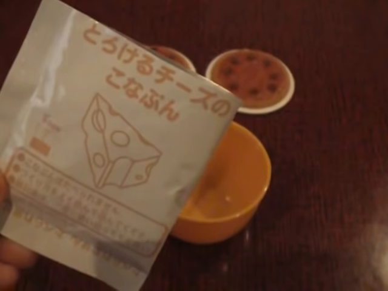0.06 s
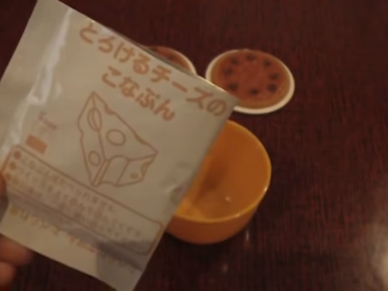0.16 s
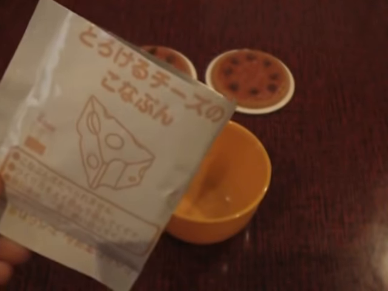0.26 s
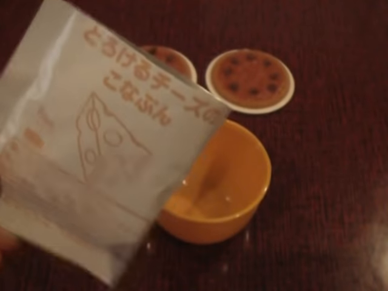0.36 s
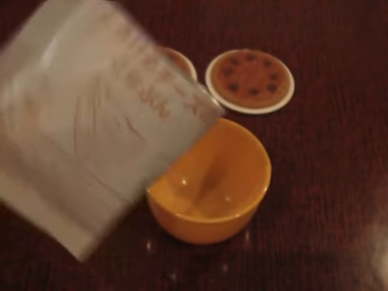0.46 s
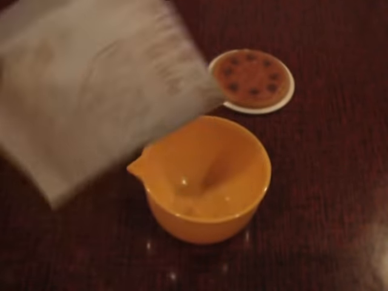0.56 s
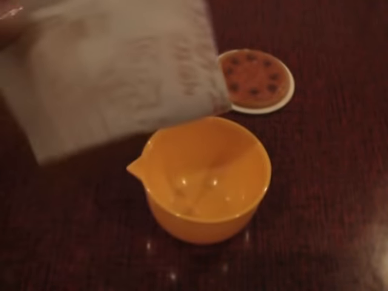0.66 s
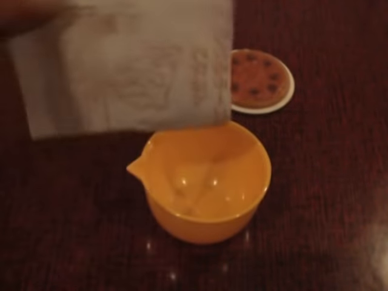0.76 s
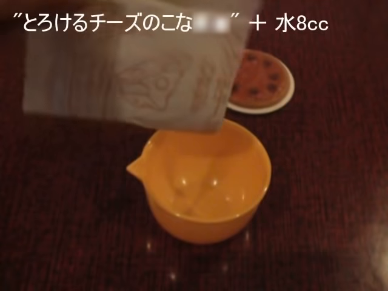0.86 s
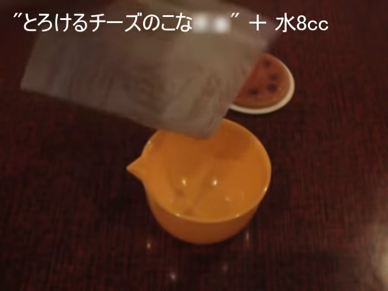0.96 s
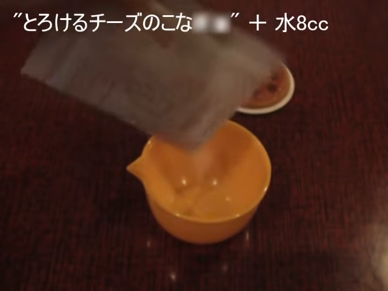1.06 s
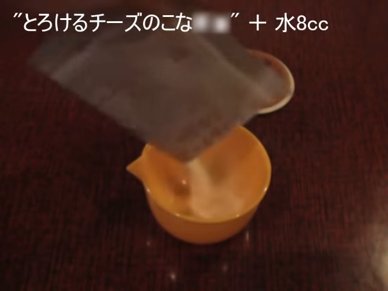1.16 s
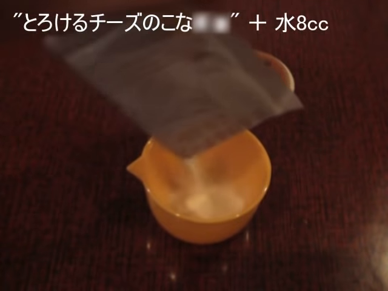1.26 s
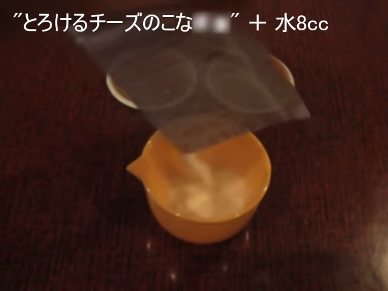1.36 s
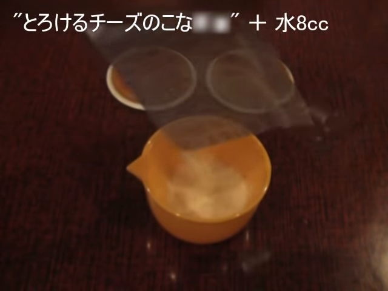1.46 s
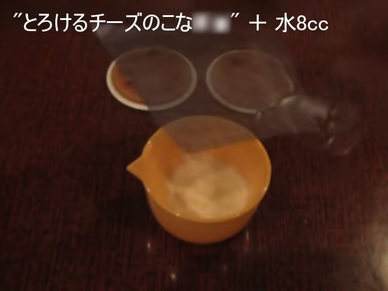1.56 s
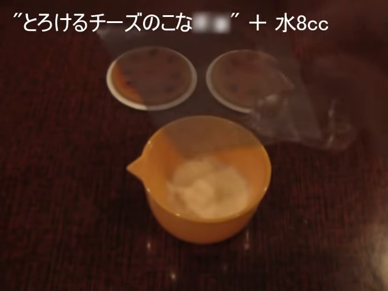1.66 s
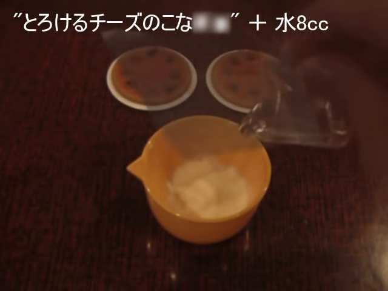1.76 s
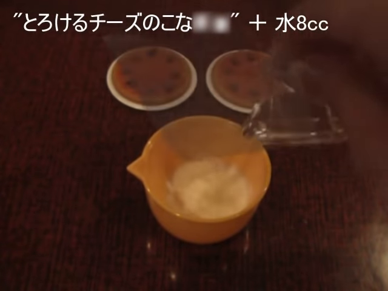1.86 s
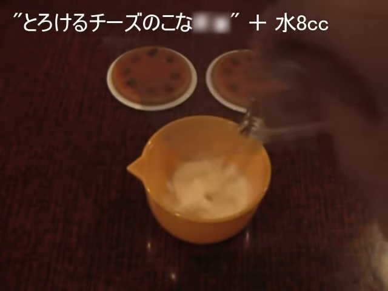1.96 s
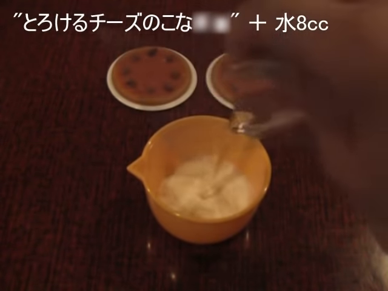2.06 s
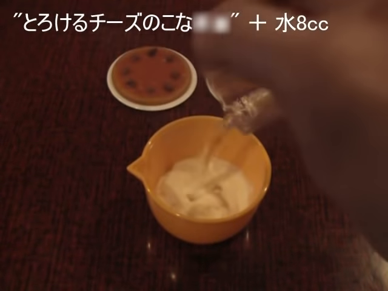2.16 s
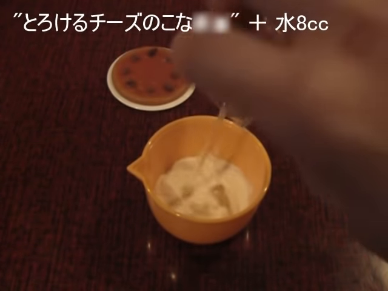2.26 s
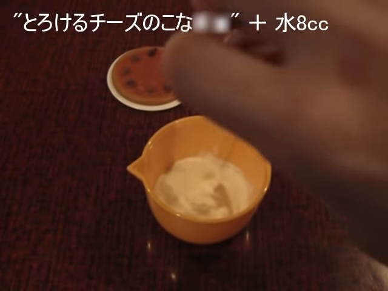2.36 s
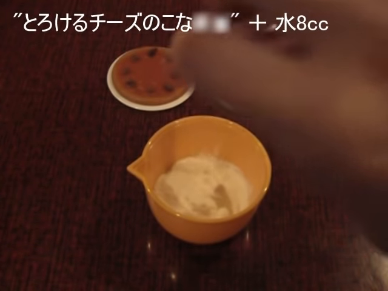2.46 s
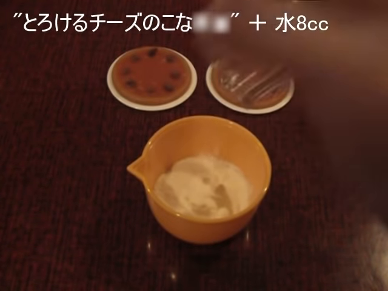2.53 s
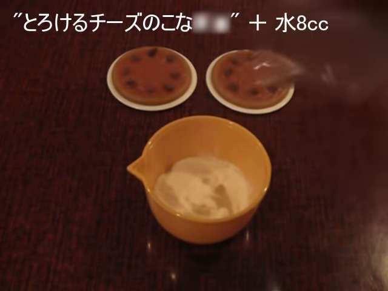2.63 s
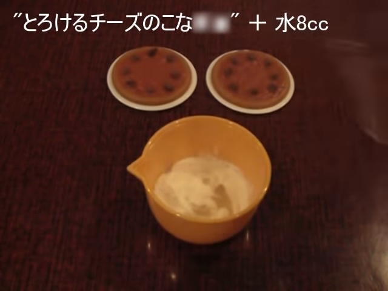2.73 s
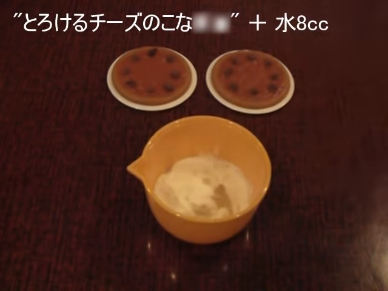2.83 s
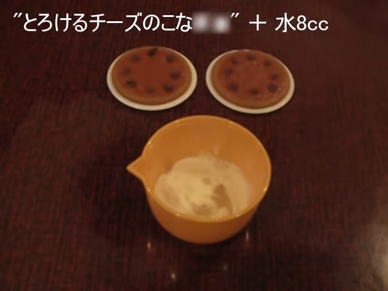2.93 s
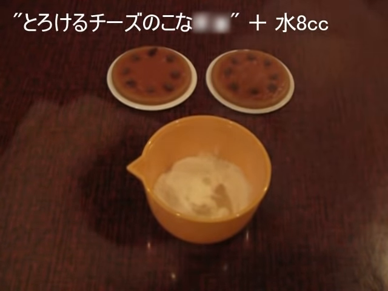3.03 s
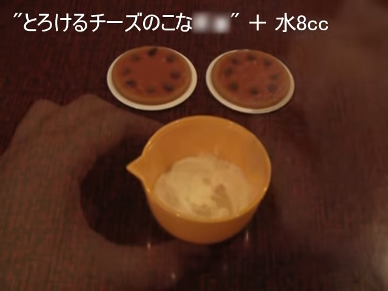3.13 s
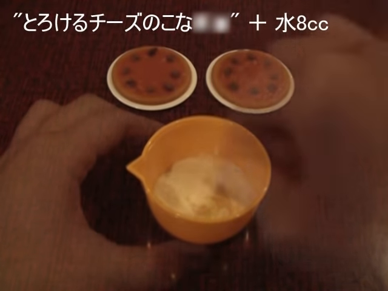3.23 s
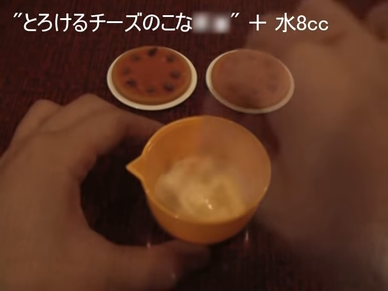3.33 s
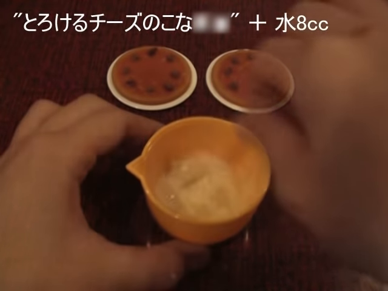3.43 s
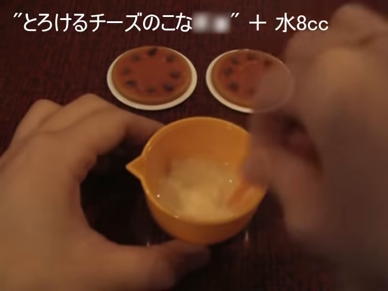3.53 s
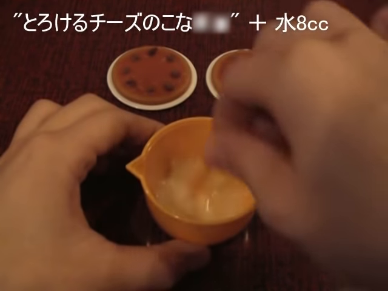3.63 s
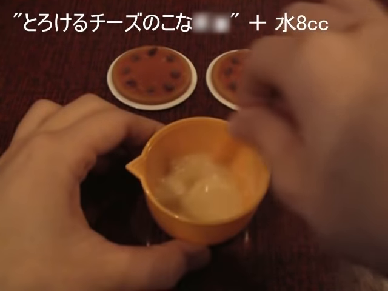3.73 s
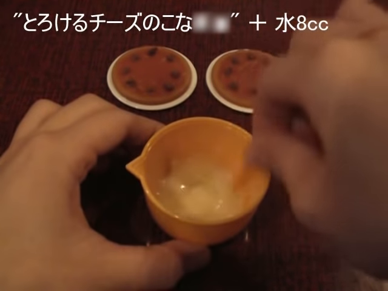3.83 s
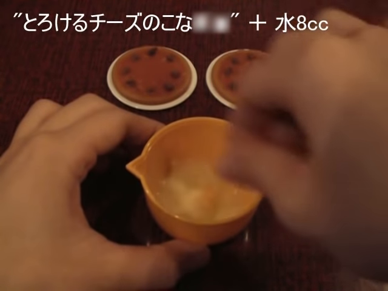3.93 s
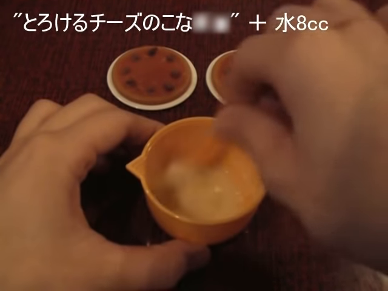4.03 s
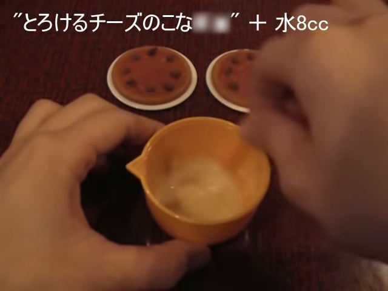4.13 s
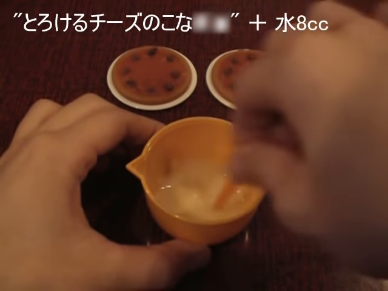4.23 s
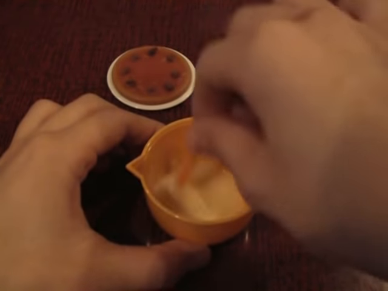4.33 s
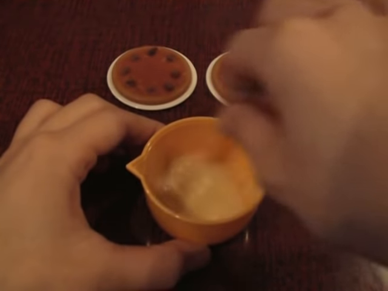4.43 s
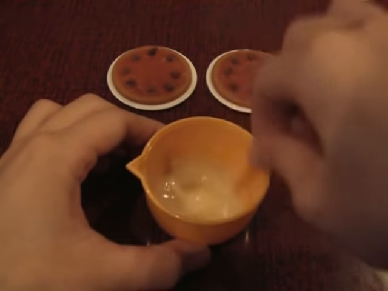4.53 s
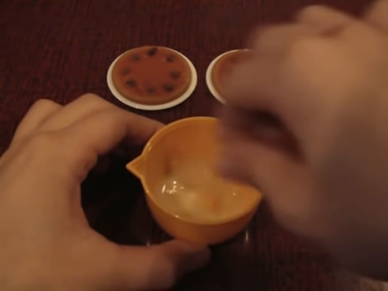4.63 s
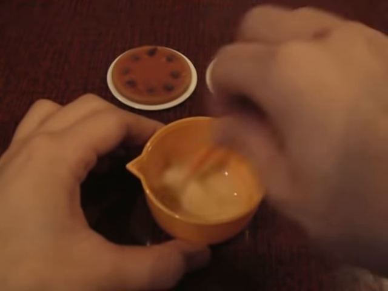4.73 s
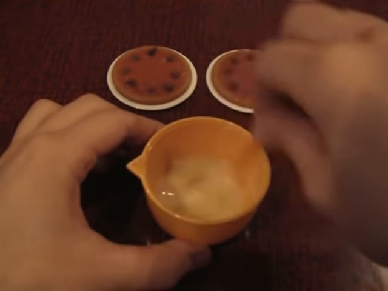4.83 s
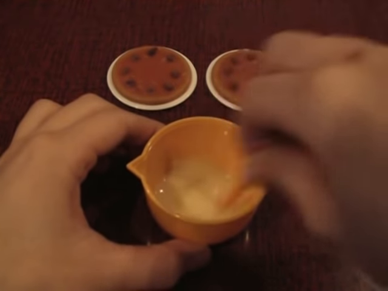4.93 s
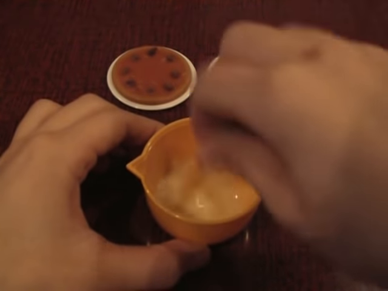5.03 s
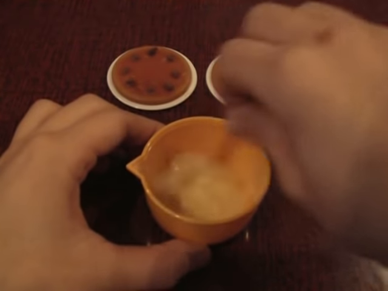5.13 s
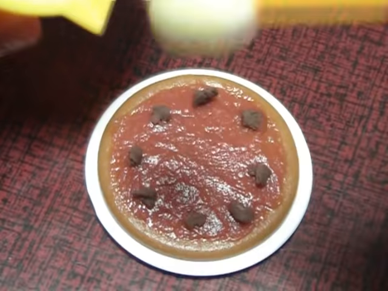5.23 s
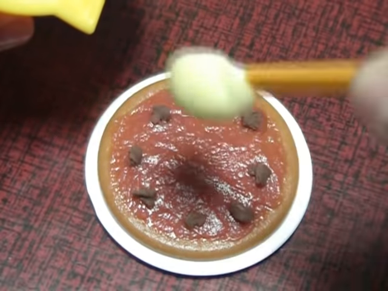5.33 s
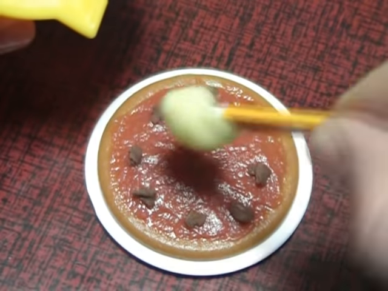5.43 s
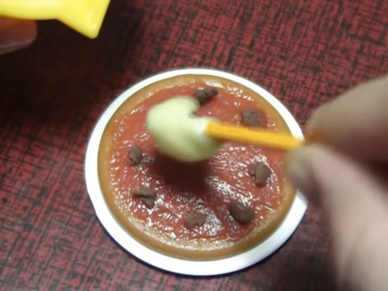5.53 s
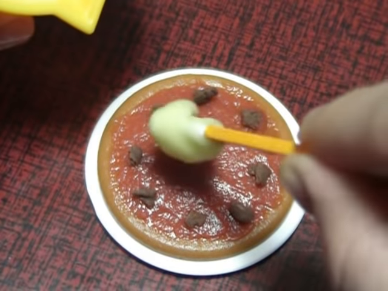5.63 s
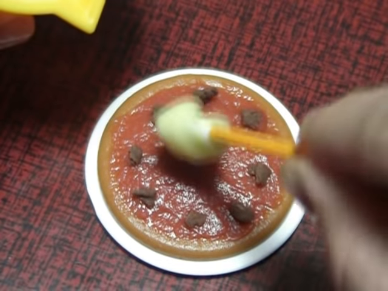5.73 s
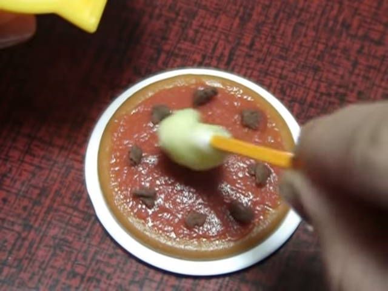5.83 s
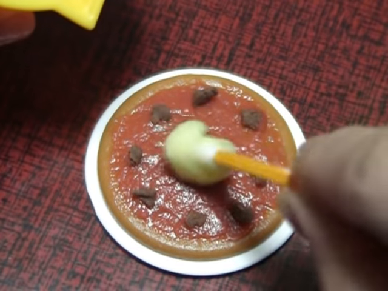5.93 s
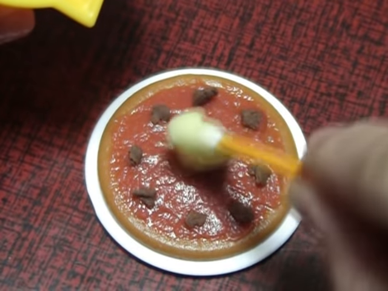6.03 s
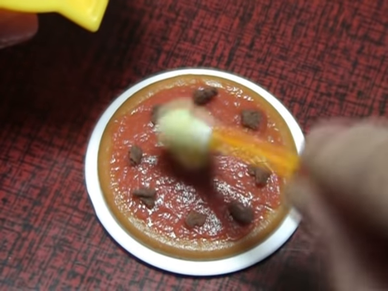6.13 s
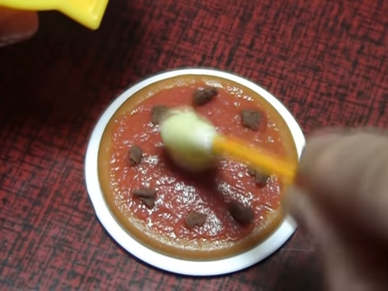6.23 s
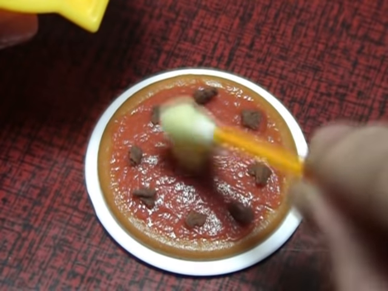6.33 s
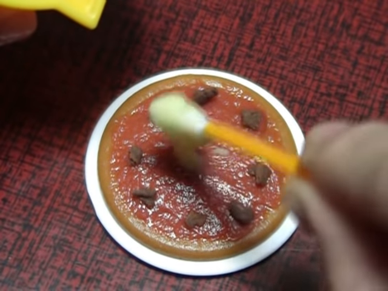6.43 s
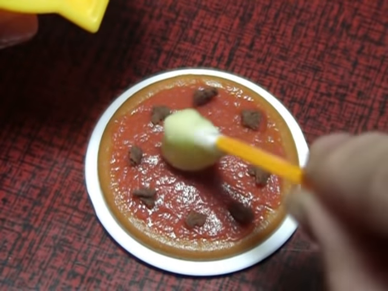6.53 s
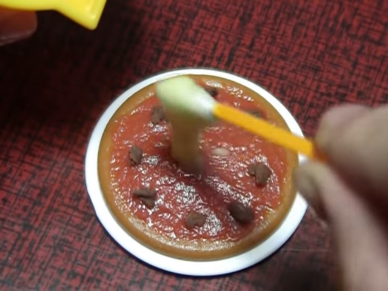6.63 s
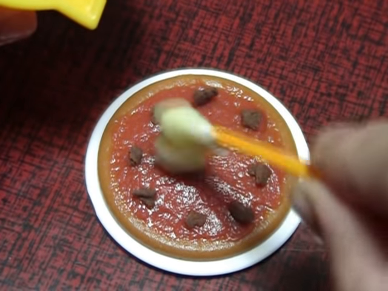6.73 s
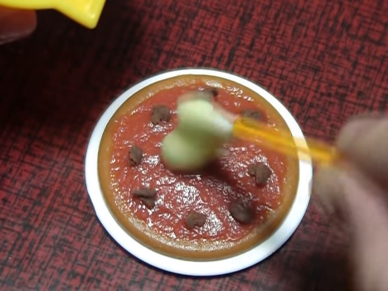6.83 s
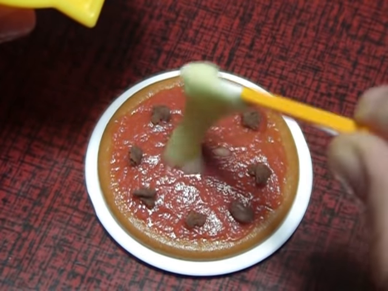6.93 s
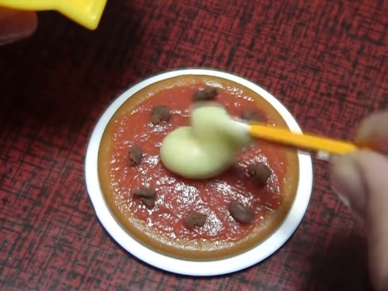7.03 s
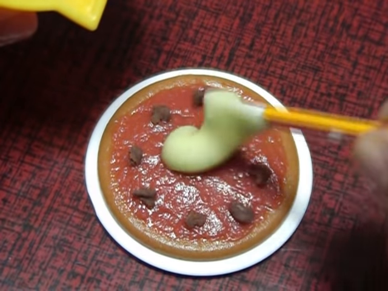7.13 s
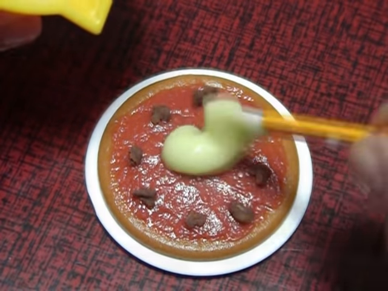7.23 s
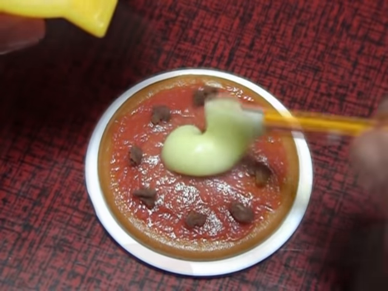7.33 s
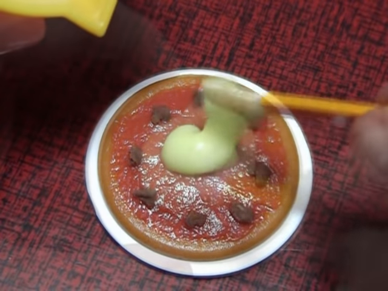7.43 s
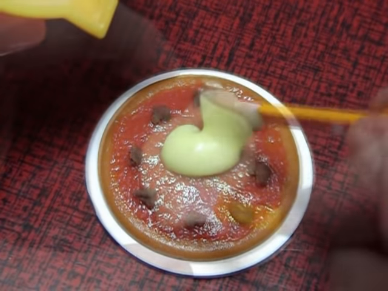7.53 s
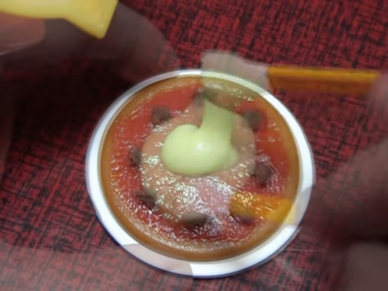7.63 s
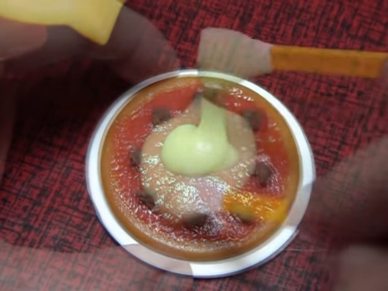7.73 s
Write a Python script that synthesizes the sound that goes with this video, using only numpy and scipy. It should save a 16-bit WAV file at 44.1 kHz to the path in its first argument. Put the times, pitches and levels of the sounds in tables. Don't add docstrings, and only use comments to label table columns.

```python
import sys
import numpy as np
from scipy import signal
from scipy.fft import rfft, irfft, next_fast_len
from scipy.io import wavfile
from scipy.ndimage import uniform_filter1d

SR = 44100
rng = np.random.default_rng(int(sys.argv[2]) if len(sys.argv) > 2 else 0)


def voltage_ratio(level):
    return 10 ** (np.asarray(level, float) / 20)


def waveform_to_disk(signal):
    frames = np.transpose(np.atleast_2d(signal))
    scaled = np.clip(frames, -1, 1) * 32767
    samples = np.round(scaled).astype(np.int16)
    wavfile.write(sys.argv[1], SR, samples)


N = 343344
T = np.arange(N) / SR
CUT_S = 5.235

# [t/s, room noise level/dB, motor hum level/dB]
BACKGROUND = [
    (0.0, -63.5, -62.5),
    (0.48, -63, -59.5),
    (1.91, -65, -66.5),
    (3.22, -65.5, -59),
    (4.8, -64.5, -62),
    (5.24, -63, -59.5),
    (6.93, -65, -58.5),
    (7.51, -67.5, -61),
]


def evened(x):
    return x / np.sqrt(np.mean(x ** 2) + 1e-20)


def read(points, hz):
    f, value = np.transpose(points)
    return np.interp(np.log(hz + 1), np.log(f + 1), value)


def follow(rows, column):
    rows = np.array(rows)
    return np.interp(T, rows[:, 0], rows[:, column])


def add(mix, s, sound):
    part = mix[round(s * SR):][:len(sound)]
    part += sound[:len(part)]


def colour(x, db_at):
    size = next_fast_len(N)
    gain = voltage_ratio(db_at(np.fft.rfftfreq(size, 1 / SR)))
    return irfft(rfft(x, size) * gain, size)[..., :N]


def ring(x, hz, width_hz):
    b, a = signal.iirpeak(np.clip(hz, 20, 2e4), max(hz / width_hz, .5), SR)
    return signal.lfilter(b, a, x)


def ring_twice(x, hz, width_hz):
    return ring(ring(x, hz, width_hz), hz, width_hz)


def slide(x, hz, width_hz):
    turn = np.exp(2j * np.pi * np.cumsum(hz) / SR)
    r = np.exp(-np.pi * width_hz / SR)
    return 2 * (turn * signal.lfilter([1 - r], [1, -r], x / turn)).real


def wander(centre_hz, spread, samples=1200):
    drift = uniform_filter1d(rng.standard_normal(N), samples)
    drift = evened(uniform_filter1d(drift, samples))
    return centre_hz * np.exp(spread * np.clip(drift, -2, 2))


def levels(moves, stops, rise_db, layer_share=None, edge_s=0.0013):
    out = np.zeros(N)
    ends = np.sort(np.r_[[row[0] for row in moves], stops, N / SR])
    for start, rise_s, db, fade, *layer_db in moves:
        t = np.arange(0, ends[ends > start + 1e-4][0] - start, 1 / SR)
        swell_db = rise_db * (t / max(rise_s, 1e-4) - 1)
        shape_db = np.where(t < rise_s, swell_db, -fade * (t - rise_s))
        level_db = db + shape_db if layer_share is None else db + layer_db[0] + layer_share * shape_db
        add(out, start, voltage_ratio(level_db) * np.clip(np.minimum(t, t[-1] - t) / edge_s, 0, 1))
    return out


def grains(per_s, spread_db, grain_ms, smooth):
    size_db = spread_db * np.minimum(rng.exponential(1, N), 2.6)
    slips = (rng.random(N) < per_s / SR) * voltage_ratio(size_db)
    fade = np.exp(-1000 / (grain_ms * SR))
    return rng.standard_normal(N) * (smooth + evened(signal.lfilter([1], [1, -fade], slips)))


def clicks(events, sharpness, edges_hz, contact_ms, usual_share=.4):
    out, t = np.zeros(N), np.arange(1600) / SR
    band = signal.butter(3, edges_hz, "bandpass", fs=SR, output="sos")
    bursts = rng.standard_normal((len(events), len(t)))
    for (s, db, hz, *share), noise in zip(events, bursts):
        burst = noise * np.exp(-1000 * t / contact_ms) * np.minimum(t / 0.0003, 1)
        tone = ring(ring(burst, hz, hz / sharpness), hz, hz / 1.3)
        snap_share = share[0] if share else usual_share
        sound = evened(tone) + snap_share * evened(signal.sosfilt(band, burst))
        add(out, s, voltage_ratio(db) * sound / abs(signal.hilbert(sound)).max())
    return out


def scrape():
    # [t/s, rise/s, wall level/dB, fade/(dB/s), grit re wall/dB]
    strokes = [(3.08, 0.0088, -47.5, 600, -6), (3.135, 0.033, -52, 330, -2.5), (3.22, 0.047, -47, 100, -4),
               (3.28, 0.0071, -45.5, 150, -1), (3.315, .01, -43.5, 50, 0), (3.345, 0.029, -52.5, 0, -2),
               (3.397, .002, -60, 0, -2), (3.414, .003, -48.5, 100, -3), (3.46, .002, -57, 0, 3),
               (3.49, 0.0035, -46.5, 100, 5), (3.512, .012, -48.5, 60, 6.5), (3.575, .002, -58.5, 0, 4),
               (3.64, .003, -53, 0, 2), (3.672, 0.0025, -48.5, 120, -1.5), (3.83, 0.0025, -44, 0, -3.5),
               (3.853, 0.0041, -35.5, 500, -4), (3.89, 0.0033, -52, 280, -1.5), (3.93, 0.061, -49, 5, 0),
               (3.972, 0.003, -44, 113, 0.5), (4.152, 0.072, -45.5, 166, -3.5),
               (4.283, 0.0063, -44.5, 130, -1), (4.345, 0.0033, -46, 100, 0), (4.372, 0.0044, -42, 400, -4),
               (4.451, 0.0056, -41.5, 230, -1.5), (4.533, .003, -48, 30, 2), (4.585, .002, -51, 60, 4.5),
               (4.62, .004, -46, 200, 2.5), (4.636, 0.036, -43, 0, 4), (4.672, 0.0025, -31.5, 20, -7.5),
               (4.695, 0.0017, -42, 215, -3.5), (4.832, .002, -44, 200, -1.5), (4.86, .002, -45, 500, -2),
               (4.878, 0.018, -43, 100, -2), (4.906, .002, -42, 500, 1), (4.925, .002, -50, 200, 2),
               (4.966, 0.002, -48, 150, 6), (5.014, .004, -40, 38, -0.5), (5.054, 0.0017, -40.5, 186, -2),
               (5.124, 0.0032, -37.5, 285, -2.5)]
    lifts = [
        3.724,
        4.074,
        4.408,
        4.765,
        5.19,
    ]
    # [t/s, rise/s, rumble level/dB, fade/(dB/s)]
    pushes = [(3.08, .002, -72, 110), (3.254, .002, -71, -14), (3.83, 0.02, -60, 120),
              (3.95, .02, -52, 100), (4.15, 0.042, -60.5, 15), (4.36, .015, -55, 100),
              (4.45, .005, -57, 30), (4.66, 0.017, -50.5, 300), (4.855, .006, -55, 70),
              (5.01, 0.014, -57, 38), (5.115, .012, -48, 400)]
    # [f/Hz, width/Hz, level/dB]
    cup_modes = [(851, 380, -9), (1860, 80, 4.5), (2430, 56, -23), (3040, 160, 1), (3560, 320, -0.5),
                 (4090, 12, 0.5), (4630, 96, 5)]
    # [f/Hz, density/dB per Hz]
    wall_db = [(260, -30), (450, -14), (787, 3), (860, 9), (1010, -8.5), (2490, -10.5), (2810, -15),
               (3600, -4.5), (6500, -51), (8450, -53), (14300, -120)]
    # [f/Hz, density/dB per Hz]
    grit_db = [(3240, -22), (5500, -8.5), (6660, -8.5), (7120, -2), (7730, -3.5), (8390, 1), (9810, -5.5),
               (11700, -16.5), (14000, -51)]
    # [t/s, f/Hz]
    tip_path = [(3.09, 1440), (3.17, 2800), (3.43, 1220), (3.5, 2420), (3.7, 1510), (3.86, 2570),
                (3.9, 1860), (4.2, 1950), (4.255, 3800), (4.29, 2550), (4.45, 1390), (4.52, 1700),
                (4.6, 3900), (4.65, 2200), (4.84, 1500), (4.9, 2330), (5.02, 2200), (5.055, 3600),
                (5.13, 1450)]
    rise_db = 12.5

    slip = grains(per_s=260, spread_db=2.2, grain_ms=2.2, smooth=.9)
    crush = .6 * evened(slip) + evened(grains(per_s=180, spread_db=2, grain_ms=.9, smooth=.9))

    broad = evened(colour(slip, lambda hz: read(wall_db, hz)))
    reach = uniform_filter1d(rng.standard_normal((len(cup_modes), N)), 1500)
    modes = np.zeros(N)
    for (hz, width_hz, db), r in zip(cup_modes, reach):
        mode_db = db + 5.4 * evened(r).clip(-3, 1.2)
        modes += voltage_ratio(mode_db) * ring(slip, hz, max(width_hz, 110))
    tip_hz = follow(tip_path, column=1)
    patch = evened(slide(slide(slip, tip_hz, 1200), tip_hz, 1200))
    wall = evened(broad + 0.65 * evened(modes) + 1.6 * patch)

    grit = evened(colour(crush, lambda hz: read(grit_db, hz)))
    grain_hz = wander(8100, 0.13, samples=830)
    grit = evened(grit + 0.38 * evened(slide(grit, grain_hz, 830)))

    table = ring(slip, 134, 57) + 1.08 * ring(slip, 278, 103)
    rumble = evened(ring(table, 205, 410))
    return (wall * levels(strokes, lifts, rise_db) * voltage_ratio(-2.0)
            + grit * levels(strokes, lifts, rise_db, layer_share=0.82) * voltage_ratio(-4.0)
            + rumble * levels(pushes, lifts, 11.0, edge_s=0.0036))


def knocks():
    # [t/s, peak/dB, f/Hz, broad snap share if not usual]
    hits = [(3.086, -45.5, 1400), (3.193, -35.5, 1820), (3.266, -27.5, 1860), (3.326, -33.5, 2030),
            (3.45, -39, 1950), (3.495, -31, 2000), (3.511, -29, 2100), (3.636, -31.5, 2050),
            (3.674, -27.5, 1380, 2.5), (3.833, -36, 2400), (3.859, -24.5, 1960), (3.962, -27.5, 1960),
            (4.009, -35.5, 2050), (4.157, -33.5, 1500), (4.194, -25, 1950), (4.218, -31.5, 940),
            (4.291, -32.5, 1860), (4.348, -30.5, 4570), (4.377, -32.5, 880), (4.453, -26, 1500),
            (4.506, -32, 1650), (4.536, -35.5, 760), (4.683, -34, 2430), (4.732, -30, 1860),
            (4.833, -28.5, 1700), (4.862, -29, 1400), (4.907, -22, 2090, 2), (4.967, -29.5, 1230),
            (5.017, -25.5, 2010), (5.127, -32, 1390), (3.167, -39.5, 3450), (3.288, -34, 2050),
            (3.297, -40, 2000), (3.373, -43, 2440), (3.387, -46, 1500), (3.416, -38, 1090),
            (3.423, -39, 900), (3.433, -41, 1500), (3.526, -36, 2200), (3.532, -36, 3950),
            (3.595, -48, 2030), (3.604, -41.5, 1960), (3.855, -33, 3020), (3.866, -31, 2900),
            (3.95, -41, 3000, 2), (3.977, -30.5, 1980), (3.988, -33, 2000), (4.016, -35, 2000),
            (4.26, -40, 3740), (4.308, -35, 3300), (4.46, -31.5, 1620), (4.475, -37, 1500),
            (4.488, -39, 1600), (4.574, -37.5, 1930), (4.579, -31.5, 4280), (4.599, -36, 3640),
            (4.896, -32, 3500), (5.04, -32, 2400), (5.055, -32.5, 3940), (5.138, -35, 1400)]
    return clicks(hits, 6.1, [500, 4300], contact_ms=2.03, usual_share=0.7)


def crushed_grains():
    # [t/s, peak/dB, f/Hz]
    cracks = [(3.1413, -44, 8100), (3.1652, -43, 8540), (3.1946, -33.5, 8360), (3.265, -39, 9090),
              (3.2859, -37, 8690), (3.3054, -38, 8810), (3.3185, -35, 8230), (3.3353, -31, 9200),
              (3.405, -30.5, 9500), (3.4331, -40, 8130), (3.4516, -32, 8140), (3.493, -26.5, 9140),
              (3.5249, -34, 8170), (3.5518, -36, 7110), (3.5673, -26.5, 8350), (3.6017, -43, 8150),
              (3.6356, -26, 8030), (3.6494, -39, 7140), (3.6686, -39, 7320), (3.6955, -39, 8800),
              (3.7114, -43, 8630), (3.8412, -38, 9350), (3.8557, -33, 7700), (3.865, -26, 7710),
              (3.9499, -35, 8160), (3.9617, -35, 8860), (3.976, -34, 7640), (4.0094, -35, 8570),
              (4.1824, -44, 7080), (4.2043, -29.5, 8350), (4.219, -23.5, 8420), (4.2882, -39, 9030),
              (4.3064, -30, 8060), (4.348, -32, 8100), (4.3554, -33, 8600), (4.377, -29, 8650),
              (4.4023, -37, 8600), (4.452, -22.5, 8000), (4.5057, -35, 7960), (4.578, -33, 8200),
              (4.6069, -35, 8480), (4.6324, -37, 9170), (4.6738, -24, 8490), (4.682, -23, 8190),
              (4.7296, -34, 8490), (4.7526, -35, 8600), (4.8334, -36, 8370), (4.8614, -34, 7150),
              (4.8938, -35, 8100), (4.9067, -29, 8400), (4.966, -17.5, 7470), (5.02, -26.5, 8300),
              (5.0254, -29, 7400), (5.0556, -23, 8300), (5.0694, -32, 8390), (5.098, -33, 8510),
              (5.1277, -30, 8400), (5.1622, -36, 8310)]
    return clicks(cracks, 13.0, [5000, 10500], contact_ms=1.0, usual_share=0.13)


def powder():
    # [t/s, rise/s, hiss level/dB, fade/(dB/s), rustle re hiss/dB]
    shakes = [(.547, 0.002, -48, 400, -6), (.56, .002, -51, 600, -12), (.872, .015, -58, 30, -10.5),
              (.95, .02, -53, 100, -10), (1.0, 0.021, -51.5, -28, -15), (1.16, 0.035, -38, 300, -17),
              (1.21, .002, -44.5, 60, -18), (1.25, .012, -47.5, 150, -18), (1.28, .002, -49, 140, -10),
              (1.348, 0.016, -43, 600, -20), (1.372, .002, -49, 46, -21), (1.495, 0.008, -43, 95, -21),
              (1.565, .002, -57.5, 30, -26), (1.666, 0.005, -42.5, 200, -35), (1.72, .002, -57, 47, -28),
              (1.925, .03, -61, 130, -9), (2.22, 0.025, -68, 5, -8), (2.425, .002, -51, 260, -5),
              (2.92, 0.058, -59.5, 200, -2), (6.8, .03, -61, 295, -6)]
    rests = [
        .6,
        2.08,
        2.36,
        2.52,
        3.04,
        6.87,
    ]
    # [f/Hz, density/dB per Hz]
    hiss_db = [(710, -46), (1200, -35), (1670, -18), (3530, 3), (4040, -3), (4960, 3), (6340, 0), (7870, 4),
               (11900, -6.5), (14000, -24)]
    rise_db = 8.5

    drive = grains(per_s=550, spread_db=.8, grain_ms=1.5, smooth=2.4)
    hiss = evened(colour(drive, lambda hz: read(hiss_db, hz) - 30 * (hz < 2300)))
    hiss = evened(hiss + .5 * evened(slide(hiss, wander(8970, 0.13), 1200)))
    rustle = evened(ring_twice(drive, 1900, 2200))
    return (hiss * levels(shakes, rests, rise_db)
            + rustle * levels(shakes, rests, rise_db, layer_share=0.94))


def creases():
    # [t/s, peak/dB, f/Hz]
    buckles = [(0.5348, -42, 6700), (0.5487, -42, 3630), (0.742, -41, 5600), (0.858, -47, 2940),
               (0.885, -36.5, 5200), (0.9284, -38, 5900), (0.965, -34, 5700), (1.0146, -38, 5000),
               (.561, -42, 7500), (.973, -38, 4000), (1.217, -36, 8000), (1.956, -40, 8740),
               (2.0134, -48, 8260), (1.0397, -25.5, 7440), (1.065, -30, 6160), (1.102, -41, 7670),
               (1.13, -32, 7280), (1.1548, -30.5, 8340), (1.1778, -36, 8130), (1.231, -35, 9600),
               (1.262, -35, 9600), (1.27, -33, 9600), (1.351, -38, 8340), (1.3634, -33, 8950),
               (1.823, -47, 8000), (1.507, -36, 7610), (1.6687, -40, 8310), (1.7425, -41, 6590),
               (1.7779, -50, 7290), (1.984, -31, 2220), (2.0513, -44, 8360)]
    return clicks(buckles, 2.4, [2500, 11000], contact_ms=0.85, usual_share=0.73)


def pats():
    # [t/s, peak/dB, f/Hz, broad snap share]
    touches = [
        (.579, -39, 450, 1),
        (.584, -39, 900, .7),
        (.743, -26.5, 1650, 6.3),
        (1.198, -40, 700, 2),
        (1.204, -40, 900, 2),
        (5.531, -49.5, 2000, .2),
        (1.983, -31.5, 1580, 0.36),
        (2.415, -37, 600, 1.2),
    ]
    return clicks(touches, 0.25, [150, 3200], contact_ms=3.2)


def cap_snaps():
    # [t/s, peak/dB, f/Hz, broad snap share]
    snaps = [
        (2.386, -36.5, 7500, 1.5),
        (2.3925, -19, 7600, 0.13),
        (2.408, -31, 9000, 0.56),
        (2.414, -15, 7040, 4),
        (2.437, -42, 10500, .3),
        (2.4425, -28, 10500, 0.3),
        (2.444, -30, 6000, 3.5),
        (2.488, -45, 7800, 1.5),
        (2.501, -49, 8400, .6),
    ]
    return clicks(snaps, 22, [1500, 9600], contact_ms=0.91)


def hollow_rings():
    # [t/s, level/dB, f/Hz, width/Hz, t60/s]
    rings = [(2.386, -35, 3460, 300, 0.032), (2.4149, -26, 3000, 500, 0.012), (2.4163, -21, 2950, 450, .02),
             (2.42, -40, 3050, 600, 0.17), (2.443, -42, 3020, 1200, 0.025), (3.955, -50, 115, 60, .35),
             (4.908, -39.5, 696, 160, 0.07), (4.674, -31.5, 8450, 700, 0.065),
             (4.674, -29.5, 2280, 800, .05), (4.683, -33, 2400, 700, 0.049), (4.688, -27, 8400, 600, 0.035),
             (4.687, -28, 1810, 700, .03), (4.967, -39, 4630, 300, 0.056), (4.459, -34, 8000, 1200, .02),
             (4.453, -38, 7000, 400, .06), (4.599, -42, 9000, 2000, .015), (5.128, -36, 800, 500, .05),
             (5.139, -38, 1300, 700, .04), (4.674, -36, 1600, 500, .06), (3.858, -36, 8000, 900, .04),
             (5.025, -38, 7300, 500, .06)]
    out, t = np.zeros(N), np.arange(9000) / SR
    noises = rng.standard_normal((len(rings), len(t)))
    for (s, db, hz, width_hz, t60_s), noise in zip(rings, noises):
        add(out, s, evened(ring_twice(noise, hz, width_hz)) * voltage_ratio(db - 60 * t / t60_s))
    return out


def thump():
    # [f/Hz, level/dB, t60/s]
    table_modes = [(58, -16, 0.32), (96, -7, 0.14), (202, 2.5, 0.036), (232.4, -11.5, .12),
                   (300, -16, 0.16), (417, -4.5, 0.026), (670, -12, 0.039), (990, -24, .02),
                   (351, -21.5, 0.14), (1500, -19, .02), (2400, -22, .02)]
    thump_s, thump_db = 5.4582, -28.5
    out, t = np.zeros(N), np.arange(9000) / SR
    rings = sum(voltage_ratio(db - 60 * t / t60_s) * np.sin(2 * np.pi * hz * t) for hz, db, t60_s in table_modes)
    touch = signal.windows.hann(40) / 20
    push = np.r_[-.52 * touch, np.zeros(15), touch]
    add(out, thump_s, voltage_ratio(thump_db) * np.convolve(rings, push))
    add(out, thump_s + 0.0129, voltage_ratio(thump_db - 14.5) * np.convolve(rings, touch))
    return out


def creaks():
    # [t/s, peak/dB, f/Hz]
    releases = [
        (5.5307, -31.5, 11000),
        (5.5942, -52.5, 9030),
        (5.623, -45, 8550),
        (6.2447, -51.5, 9060),
        (6.3041, -48.5, 8100),
        (6.373, -51, 8600),
        (6.446, -53, 8140),
        (6.5054, -50, 8650),
        (7.255, -52, 7900),
        (7.7672, -41.5, 10000),
    ]
    return clicks(releases, 3.3, [5000, 13800], contact_ms=1.24, usual_share=0.22)


def place(x, lean):
    return np.array([colour(x, lambda hz: side * read(lean, hz) / 2) for side in (1, -1)])


def room(x, t60_s=0.21):
    t = np.arange(12000) / SR
    signs = rng.choice([-1., 1.], (2, len(t)))
    taps = signs * (rng.random((2, len(t))) < .05) * voltage_ratio(-60 * t / t60_s) * (t > .0015)
    return signal.fftconvolve(x[None], taps / np.linalg.norm(taps[0]), axes=1)[:, :N]


def motor():
    # [f/Hz, level/dB]
    partials = [(420, -16), (604, -22), (840, -5.5), (1680, -26),]
    lines = sum(voltage_ratio(db) * np.sin(2 * np.pi * (hz * T + rng.random())) for hz, db in partials)
    waver = 1 + 0.12 * evened(uniform_filter1d(rng.standard_normal(N), 3000))
    hum = np.sqrt(2) * lines * waver * voltage_ratio(follow(BACKGROUND, column=2))
    return hum * voltage_ratio([[-.6], [.6]])


def air():
    # [f/Hz, density/dB per Hz]
    first_air_db = [(12, -72), (20, -6.5), (419, -6.5), (668, -10), (832, -8), (980, -9.5), (1520, -17),
                    (2170, -12), (2420, -18.5), (4810, -19), (5670, -23), (6150, -21), (11800, -29.5),
                    (14000, -67)]
    # [f/Hz, density/dB per Hz]
    second_air_db = [(12, -51), (20, -9.5), (106, -5.5), (346, -7.5), (419, -7.5), (468, -8), (687, -12.5),
                     (766, -8.5), (832, -10), (1010, -10.5), (1330, -16.5), (9030, -25.5), (11800, -32.5),
                     (14000, -63)]
    # [f/Hz, correlation]
    likeness = [(60, 0.028), (180, 0.019), (530, -0.27), (1560, 0.29), (4630, 0.23), (13700, 0.23)]
    # [f/Hz, width/Hz, first scene level/dB, second scene level/dB]
    whines = [(900, 150, -77, -75.5), (2100, 580, -91, -91), (4210, 48, -84, -99), (5610, 410, -72.5, -104),
              (10070, 300, -92, -91)]

    frames, hz = N // 256 + 5, np.fft.rfftfreq(1024, 1 / SR)
    a, b, c, d, patches = rng.standard_normal((frames, 513, 5)).T
    patches = evened(uniform_filter1d(uniform_filter1d(patches, 12, 0), 14, 1))
    same = np.clip(read(likeness, hz), -1, 1)[:, None]
    left = a + 1j * b
    right = same * left + np.sqrt(1 - same ** 2) * (c + 1j * d)
    z = np.array([left, right]) * voltage_ratio(1.22 * patches)
    white = evened(signal.istft(z, nperseg=1024, noverlap=768)[1][:, :N])

    first = evened(colour(white, lambda f: read(first_air_db, f)))
    second = evened(colour(white, lambda f: read(second_air_db, f)))
    noise = np.where(T < CUT_S, first, second) * voltage_ratio(4.5 + follow(BACKGROUND, column=1))
    for f, width_hz, first_db, second_db in whines:
        whine = evened(ring_twice(white, f, width_hz))
        noise = noise + whine * voltage_ratio(np.where(T < CUT_S, first_db, second_db))
    return noise


def scene():
    # [f/Hz, difference/dB]
    near_lean = [(60, -1), (150, -2.5), (370, -5.5), (910, -1.5), (2240, -0.5), (5550, -1.5), (9500, -5),
                 (13700, -4)]
    # [f/Hz, difference/dB]
    packet_lean = [(60, -7), (230, -2.0), (910, 1.5), (3530, 0), (13700, -6)]

    packet = powder() + creases() + pats()
    near = scrape() + knocks() + crushed_grains()
    near = near + cap_snaps() + hollow_rings() + thump() + creaks()
    echoes = colour(room(near + packet), lambda hz: -14.2 + 3.0 * np.clip(hz / 12000, 0, 1) ** 2)
    splice = 1 - .9 * (abs(T - CUT_S) < .002)
    background = (air() * voltage_ratio([[-.9], [.9]]) + motor()) * splice
    return place(near, near_lean) + place(packet, packet_lean) + echoes + background


def roll_off(x):
    return signal.sosfilt(signal.butter(12, 14320, fs=SR, output="sos"), x)


def record(dry):
    edge = signal.firwin(101, 13700, window=("kaiser", 7), fs=SR)
    mix = signal.oaconvolve(dry, edge[None], "same")
    return roll_off(mix)


dry = scene()
out = record(dry)
waveform_to_disk(out)
```